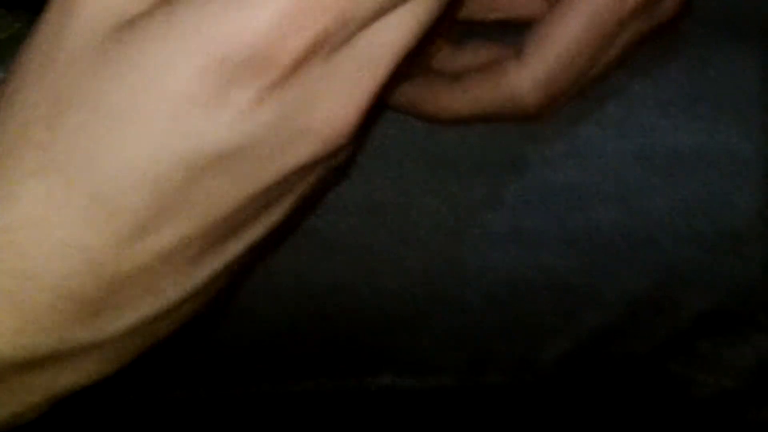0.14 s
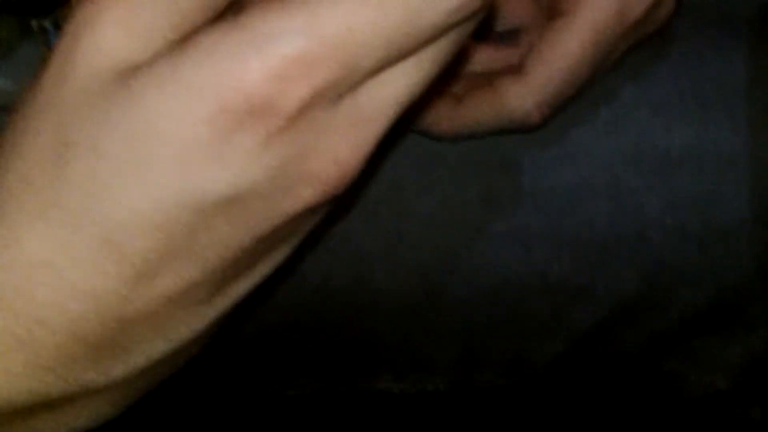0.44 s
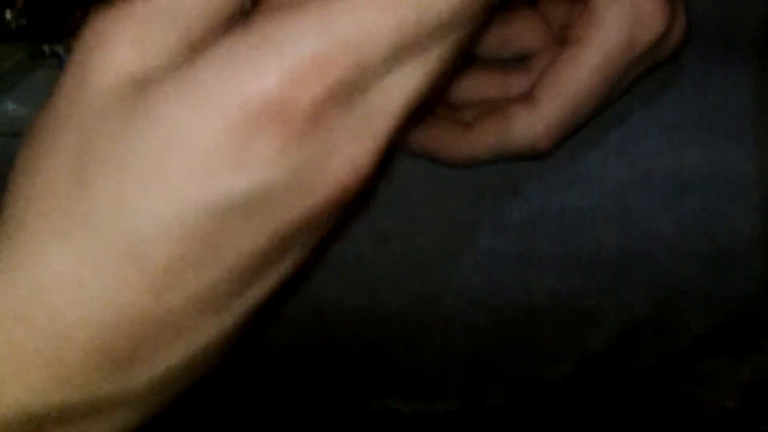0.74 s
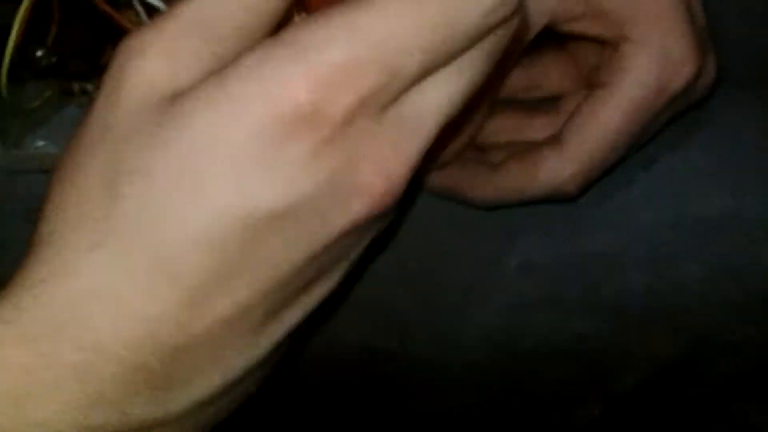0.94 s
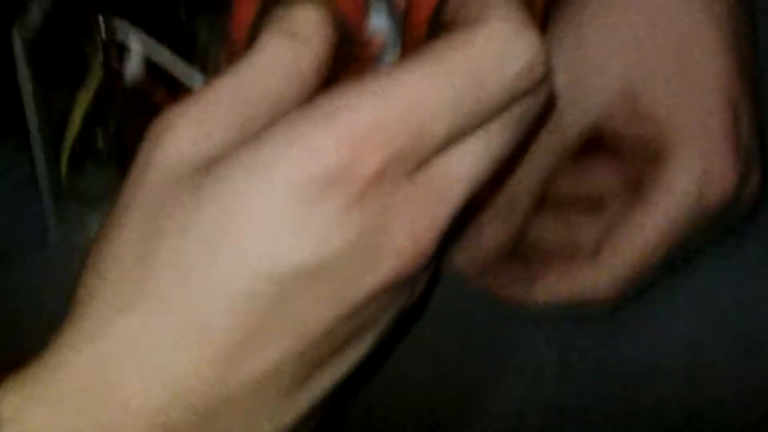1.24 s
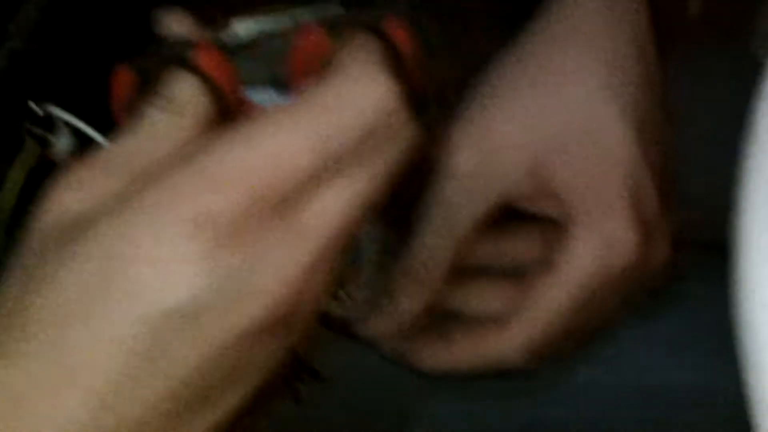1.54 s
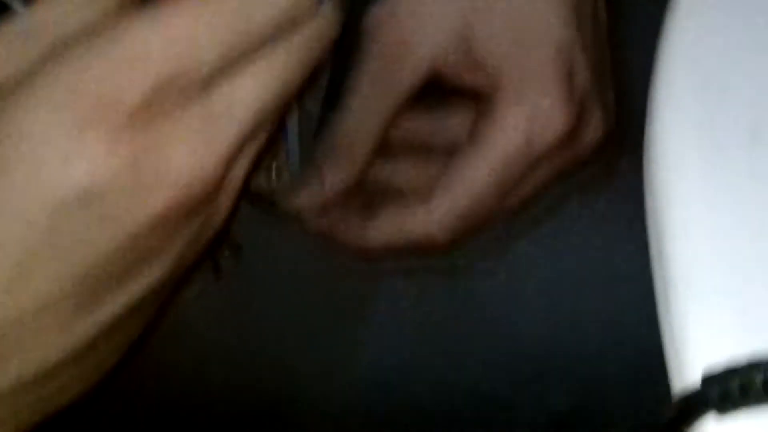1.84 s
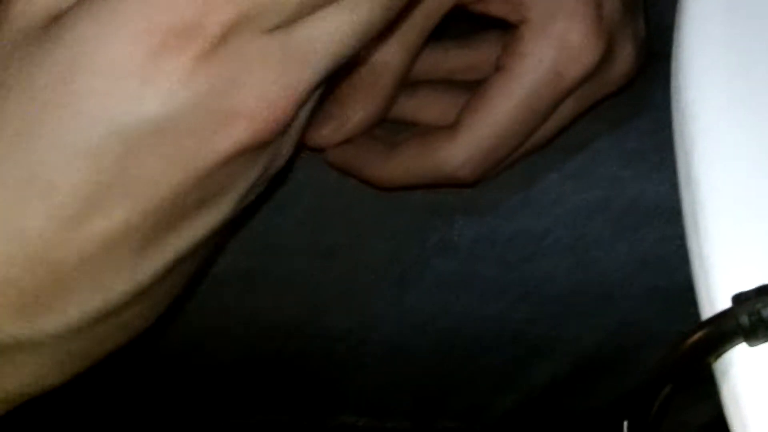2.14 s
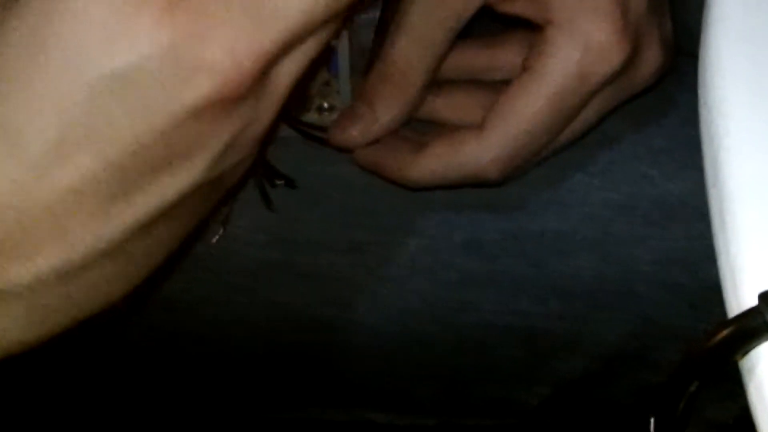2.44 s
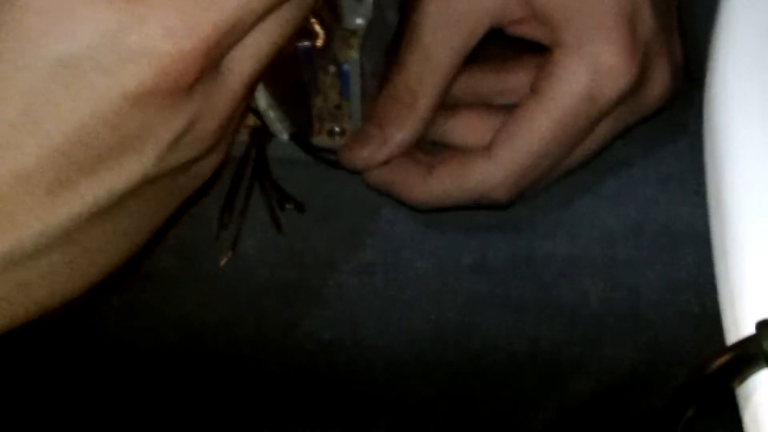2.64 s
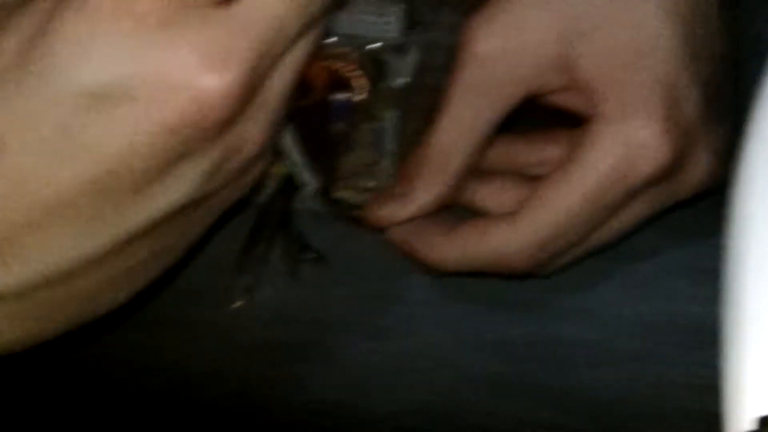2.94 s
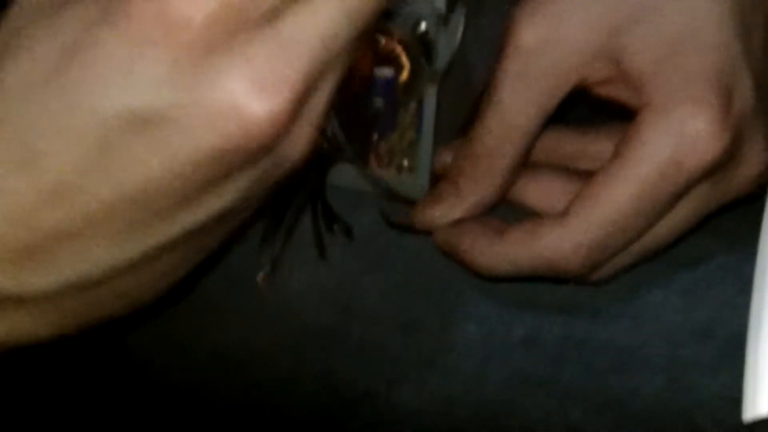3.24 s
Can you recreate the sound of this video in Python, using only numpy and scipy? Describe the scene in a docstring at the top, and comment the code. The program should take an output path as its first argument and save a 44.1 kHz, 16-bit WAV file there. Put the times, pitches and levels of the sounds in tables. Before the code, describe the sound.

Wire cutters cut a cable, heard very close in a small hard room. From 0 to 1.3 s fingers rub softly and unevenly, wires tick, faint pops mark brief rises in low mains hum, ending in a firmer board knock at 1.3. Near quiet follows, with small clicks around 2.2 and 2.7-3.0. At 3.08 the jaws snap, deafeningly sharp, clipped and steely, with a short reverberant tail; tiny ticks at 3.3. Steady hiss.

```python
"""Hands work wire cutters among the wires of a circuit board in a small room, until the jaws snap through a cable.
The snap is noise cracks and ringing steel, loud enough to overload the microphone; rubbing fingers are noise grains
through resonances, wires tick with a click and a short ring, and the board knocks in damped modes.
Mains hum, a sum of odd multiples, leaks in and steps up while the tool touches bare metal, with pops, over hiss."""
import sys
import numpy as np
from scipy import signal
from scipy.fft import rfft, irfft, next_fast_len
from scipy.io import wavfile
from scipy.ndimage import uniform_filter1d, map_coordinates

SR = 44100
rng = np.random.default_rng(int(sys.argv[2]) if len(sys.argv) > 2 else 0)


def waveform_to_disk(signal):
    """Save audio, clipped to [-1, 1], as 16-bit WAV at the path in sys.argv[1]."""
    frames = np.transpose(np.atleast_2d(signal))
    scaled = np.clip(frames, -1, 1) * 32767
    samples = np.round(scaled).astype(np.int16)
    wavfile.write(sys.argv[1], SR, samples)


def gain_from_decibels(decibels):
    """Convert decibel values to linear amplitude factors."""
    exponent = np.asarray(decibels, float) / 20
    return 10 ** exponent


N = 149940  # samples, 3.4 s


def unit(x):
    """Scales a signal to rms 1."""
    return x / np.sqrt(np.mean(x ** 2) + 1e-20)


def along(points, hz):
    """Reads a curve of (Hz, value) points on a log frequency axis."""
    f, v = np.transpose(points)
    return np.interp(np.log(hz + 1), np.log(f + 1), v)


def filtered(x, response):
    """Multiplies the spectrum of x by a complex response of frequency."""
    m = next_fast_len(N + SR // 2)
    return irfft(rfft(x, m) * response(np.fft.rfftfreq(m, 1 / SR)), m)[..., :N]


def peaks(table):
    """Response of parallel causal resonances (Hz, width Hz, dB) of alternating sign."""
    def response(f):
        total = 0
        for k, (center, width, db) in enumerate(table):
            damping = 1j * f * width
            total = total + (-1) ** k * gain_from_decibels(db) * damping / (center * center - f * f + damping)
        return total
    return response


def paired(a, b, alike):
    """Mixes two unrelated signals into left and right with a likeness that depends on frequency."""
    def spread(hz):
        turn = np.arccos(np.clip(along(alike, hz), -1, 1)) / 2
        return np.array([np.cos(turn), np.sin(turn)])
    mid, side = filtered(np.array([a, b]), spread)
    return np.array([mid + side, mid - side])


def panned(left_over_right_db):
    """Left and right gains for a level difference."""
    return gain_from_decibels([[left_over_right_db / 2], [-left_over_right_db / 2]])


def ring(modes, spread_db, detune):
    """One blow on a solid: damped modes (Hz, dB, t60 s), a little different each time."""
    t = np.arange(SR // 10) / SR
    total = np.zeros(len(t))
    for k, (hz, db, t60) in enumerate(modes):
        decay = gain_from_decibels(db + spread_db * rng.normal() - 60 * t / t60)
        total += decay * (-1) ** k * np.sin(2 * np.pi * hz * (1 + detune * rng.normal()) * t)
    return total


def burst(t60, channels):
    """A crack of noise with a fast rise that dies at once."""
    t = np.arange(SR // 20) / SR
    envelope = gain_from_decibels(-60 * t / t60) * (1 - np.exp(-t / (t60 / 40)))
    return envelope * rng.standard_normal((channels, len(t)))


def add(out, s, x):
    """Adds x to out from s seconds on."""
    part = out[..., round(s * SR):][..., :x.shape[-1]]
    part += x[..., :part.shape[-1]]


def rub():
    """Skin slips on plastic: dense grains and steady noise drive the resonances of wire and finger."""
    # course of the rubbing, points joined by straight lines:
    # time_s, level_db, then low_db, upper_db, top_db of the resonances over the main one
    course = [(0.0, -63, 1, 1, 2), (0.046, -57, -12, -3.5, -1), (0.182, -72, -12, 0, 2),
              (0.206, -50, -16, -11, -9), (0.224, -55, -21, -1, -2), (0.27, -52, -23, -1, -7),
              (0.316, -68, 1, -3, 3), (0.366, -50.5, -10, -5, -7), (0.522, -58.5, -5, -1, -4.5),
              (0.55, -47, -15.5, -5, -9.5), (0.692, -51, -14, -3, -1.5), (0.738, -72, -10, -4, 10),
              (0.748, -56, -18, -17, -12), (0.762, -80, 1, 9, 9), (0.784, -56, -12, -2, -14),
              (0.792, -62, -5, -1, 6), (0.854, -48, -15, 2, 1.5), (0.902, -50, -10, 4.5, 3),
              (0.99, -71, -6, 2, 7), (1.0, -74, 6, -6, 2), (1.04, -59.5, -11, -1, -3),
              (1.12, -57, -9, -1, -1), (1.2, -61, -8, -0.73, -2), (1.28, -55, -8, -0.78, -4),
              (1.3, -74, -6.5, -1, -3)]
    # resonance groups main, low, upper, top: center_hz, width_hz, level_db (each response is applied twice)
    skin_bands = [
        [(2100, 1530, 1.5), (2880, 2640, -2)],
        [(1230, 590, 0.1)],
        [(3700, 2800, 2), (6500, 8900, -4)],
        [(10430, 5800, 0.1)],
    ]
    rub_db, grains_per_s, grain_spread_db = -0.23, 3000, 1
    s, level_db, *over_db = np.transpose(course)
    t = np.arange(N) / SR
    slips = rng.random((2, N)) < grains_per_s / SR
    sizes = gain_from_decibels(grain_spread_db * rng.standard_normal((2, N))) * rng.standard_normal((2, N))
    friction = unit(slips * sizes) + 0.81 * rng.standard_normal((2, N))
    pair = paired(*friction, [(2000, 0.62), (10000, 0.23)])
    main, *others = [unit(filtered(pair, lambda f: peaks(band)(f) ** 2)) for band in skin_bands]
    body = main + sum(gain_from_decibels(np.interp(t, s, db)) * x for db, x in zip(over_db, others))
    # practically silent after the last point
    return gain_from_decibels(rub_db + np.interp(t, s, level_db, right=-120)) * body * panned(-1.6)


def room(x):
    """A small hard room: a noise tail that builds up softly, each frequency dying at its own speed."""
    # decay of the tail: frequency_hz, t60_s
    decay_times = [(200, 0.63), (1000, 0.37), (4000, 0.33), (8000, 0.32), (14000, 0.27)]
    # left-right likeness of the tail: frequency_hz, likeness (1 = same)
    tail_likeness = [(500, 0.95), (2000, 1), (5000, 0.37), (12000, 0.13)]
    build_up_s = 0.0087
    hz, t, z = signal.stft(rng.standard_normal((2, SR * 3 // 4)), SR, nperseg=256)
    fading = z * gain_from_decibels(-60 * t / along(decay_times, hz)[:, None])
    tail = signal.istft(fading, SR, nperseg=256)[1]
    tail = tail * (1 - np.exp(-np.arange(tail.shape[1]) / SR / build_up_s))
    wet = signal.fftconvolve(x[None], tail / np.linalg.norm(tail[0]), axes=1)[:, :N]
    return paired(*wet, tail_likeness)


def hum():
    """Mains sine plus the odd multiples of rectifier pulses; touching metal lifts it, and pops mark the contact."""
    # strength of the hum: multiple of the mains pitch: level_db
    multiples = {1: -55.5, 3: -58.5, 5: -63, 7: -70, 9: -78, 11: -75, 13: -75}
    # slow drift with the hands' nearness, used relative to its last point: time_s, level_db
    nearness = [(0.0, -52.5), (0.84, -54), (0.95, -53.5), (1.06, -51), (1.43, -55), (3.37, -53.5),
                (3.4, -54)]
    # spells of touching bare metal: start_s, end_s, gain_db
    touches = [(0.177, 0.193, 5.5), (0.528, 0.612, 6.5), (0.688, 0.89, 5.5), (1.01, 1.188, 3.5)]
    # contact pops: start_s, level_db
    contact_pops = [(0.164, -38.5), (0.527, -35.5), (0.675, -37), (1.063, -33.5)]
    mains_hz, pulse_s, skew_rad, sine_rad = 50, .0146, -2.3, .59
    waver_db, pop_rise_s = .5, 0.00025
    t = np.arange(N) / SR
    s, drift_db = np.transpose(nearness)
    gain_db = np.interp(t, s, drift_db) - drift_db[-1]
    for start, end, lift_db in touches:
        gain_db += lift_db * ((t > start) & (t < end))
    # each multiple wavers smoothly through 15 random points per second
    points = [np.repeat(list(multiples), N), np.tile(t * 15, len(multiples))]
    wavers = map_coordinates(rng.standard_normal((14, 60)), points).reshape(-1, N)
    wave = np.zeros(N)
    for (k, level_db), waver in zip(multiples.items(), wavers):
        phase = sine_rad if k == 1 else skew_rad - 2 * np.pi * k * mains_hz * pulse_s
        gain = gain_from_decibels(level_db + waver_db * np.sqrt(k) * waver)
        wave += gain * np.cos(2 * np.pi * k * mains_hz * t + phase)
    out = np.sqrt(2) * gain_from_decibels(uniform_filter1d(gain_db, size=300)) * wave
    u = np.arange(SR // 50) / SR / pop_rise_s
    for s, db in contact_pops:
        add(out, s, gain_from_decibels(db) * np.e * u * np.exp(-u))  # the pulse peaks after pop_rise_s
    return out * panned(-3)


def hiss():
    """Microphone and room noise: stereo white noise shaped by a spectrum curve."""
    # noise color before leveling: frequency_hz, density_db
    color = [(35, -40.5), (60, -4), (98, -15), (152, -7), (200, -8), (246, -5), (297, -11), (349, -9.5),
             (392, -11.5), (15200, -22.5)]
    # left-right likeness: frequency_hz, likeness (1 = same)
    likeness = [(100, 0.75), (1000, 0.17), (10000, 0.1)]
    pair = paired(*rng.standard_normal((2, N)), likeness)
    shaped = filtered(pair, lambda hz: gain_from_decibels(along(color, hz)))
    return gain_from_decibels(-52) * unit(shaped) * panned(-1.4)


def knocks():
    """The board is bumped and its damped modes ring; a harder contact adds a louder noise clack."""
    # bumps: start_s, level_db, hardness_db (clack over the level)
    bumps = [(.2, -39, -11), (.273, -32.5, -10), (.719, -39, -11), (.747, -45.5, -10), (1.3022, -22.5, 5.5),
             (1.3029, -24, 11), (1.308, -27, -19), (1.346, -46, 17), (1.357, -36, -4), (1.785, -45, 6),
             (2.224, -32.5, 0), (2.235, -37.5, -12), (2.706, -44.5, 0), (2.959, -39.5, -10)]
    # modes of the board: pitch_hz, level_db, t60_s
    board_modes = [(593, -5, 0.02), (803, -2, 0.022), (948, -3, 0.026), (1176, -5, .018), (1456, -3, .013),
                   (1780, -9, 0.008)]
    # clack resonance, applied twice: center_hz, width_hz, level_db
    clack_band = [(2580, 4960, 0)]
    body, clacks = np.zeros(N), np.zeros(N)
    for s, db, hard_db in bumps:
        add(body, s, gain_from_decibels(db - 4) * ring(board_modes, spread_db=2, detune=.03))
        add(clacks, s, gain_from_decibels(db + hard_db) * burst(t60=.012, channels=1)[0])
    return body + filtered(clacks, lambda f: peaks(clack_band)(f) ** 2)


def ticks():
    """Wires and solder legs tick against the tool: a bright click and one short ring each."""
    # contacts: start_s, level_db, ring_hz, ring_db over the click, left_over_right_db
    contacts = [(.2618, -35.5, 2100, -12, 1), (.7747, -43, 3000, -14, -1.5),
                (.9554, -33.5, 2220, -14, -1.2), (1.022, -35, 11700, -3, -4), (1.0892, -42, 2400, -3.5, 9),
                (1.1151, -32, 2340, -5, -1.2), (1.1174, -33, 2530, -2.5, 16), (1.1318, -31, 2450, -7, -9),
                (1.138, -37, 9100, -6, -2.2), (1.1747, -38.5, 2420, -12, -11),
                (1.2005, -36.5, 2460, -1.5, 5), (1.2897, -32, 3560, -13, -8.5),
                (1.2925, -44, 8100, -11.5, 2), (1.2932, -26, 3310, -6.5, 13), (1.2973, -37, 6500, -7, 2),
                (2.2014, -40, 2300, -1, 2.5), (2.2124, -38, 5830, -2.5, 9), (2.2145, -37, 2350, -2, 3),
                (2.204, -42, 5900, -6, .4), (2.839, -48.5, 2750, 6, 5), (2.995, -30, 7230, -0.5, 5.5),
                (3.0134, -45, 3440, 0, 5), (3.291, -35, 2750, 1, 3), (3.292, -30, 7220, 0, 7)]
    # click resonance, applied twice: center_hz, width_hz, level_db
    click_band = [(6900, 14300, -0.5)]
    click_t60_s, ring_t60_s = .011, .013
    clicks, rings = np.zeros((2, N)), np.zeros((2, N))
    for s, db, hz, ring_db, pan_db in contacts:
        gain = gain_from_decibels(db) * panned(pan_db)
        add(clicks, s, gain * burst(click_t60_s, channels=1))
        add(rings, s, gain * ring([(hz, ring_db, ring_t60_s)], spread_db=2.0, detune=0.012))
    return filtered(clicks, lambda f: peaks(click_band)(f) ** 2) + rings


def snap():
    """Cable strands part, steel jaws slam shut and rebound; also returns the blow that the walls get."""
    # strands part, jaws meet, rebounds: start_s, level_db
    hits = [(3.0796, 4), (3.0803, 3), (3.0811, 1), (3.0836, -8), (3.0859, -13)]
    # modes of the steel jaws: pitch_hz, level_db, t60_s
    jaw_modes = [(275, -32.5, 0.017), (430, -30, 0.071), (660, -37, 0.038), (853, -18, 0.02),
                 (1122, -17, 0.017), (1730, -23.5, 0.013), (2620, -17, 0.016), (3820, -17.5, 0.0059),
                 (4540, -14, .013), (5230, -19, 0.024), (5200, -16, 0.018), (7700, -12.5, 0.028),
                 (9320, -4, .011), (11880, -17, 0.01)]
    # crack resonance, applied twice: center_hz, width_hz, level_db
    crack_band = [(7540, 11900, 1)]
    # what the snap sends to the walls: frequency_hz, level_db
    wall_color = [(200, -15), (500, -12.5), (1000, -1), (2500, -1), (5000, 1.5), (8000, 1.7), (11000, -5),
                  (15000, -13)]
    crack_db, crack_t60_s, blow_db = 3.5, .006, 16.5
    cracks, rings, blow = np.zeros((2, N)), np.zeros(N), np.zeros(N)
    for s, db in hits:
        noise = burst(crack_t60_s, channels=3)
        stereo = noise[0] + 0.74 * noise[1:]  # one shared noise, one more for each side
        add(cracks, s, gain_from_decibels(db + crack_db) * stereo)
        add(rings, s, gain_from_decibels(db) * ring(jaw_modes, spread_db=1.0, detune=0.0088))
    blow[round(hits[0][0] * SR)] = gain_from_decibels(blow_db)
    direct = rings + filtered(cracks, lambda f: peaks(crack_band)(f) ** 2)
    return direct, filtered(blow, lambda hz: gain_from_decibels(along(wall_color, hz)))


def scene():
    """The hands' sounds ring in the room, overload the capsule and pass a low cut; hum and hiss join after."""
    room_db, tick_room_db, low_cut_hz, overload = -4, -4.5, 150, 1.15
    (cut, blow), tick, knock, skin = snap(), ticks(), knocks(), rub()
    to_room = knock + skin.mean(0) + gain_from_decibels(tick_room_db) * tick.mean(0)
    wet = room(blow) + gain_from_decibels(room_db) * room(to_room)
    air = np.clip(cut + tick + knock + skin + wet, -overload, overload)
    # a gentle low cut thins the close sounds and the overload
    thin = filtered(air, lambda f: (1j * f / (low_cut_hz + 1j * f)) ** 2)
    return thin + hum() + hiss()


def low_pass(x):
    """Removes everything above the highest recorded frequency."""
    return signal.sosfilt(signal.butter(12, 15350, fs=SR, output="sos"), x)


def record(dry):
    """The input sits slightly off zero and clips at full scale."""
    offset = -0.0013
    mix = np.clip(dry + offset, -1, 1)
    return low_pass(mix)


dry = scene()
out = record(dry)
waveform_to_disk(out)
```